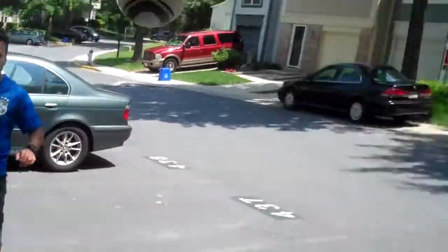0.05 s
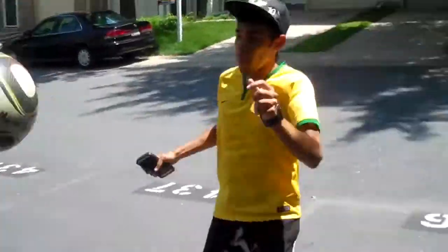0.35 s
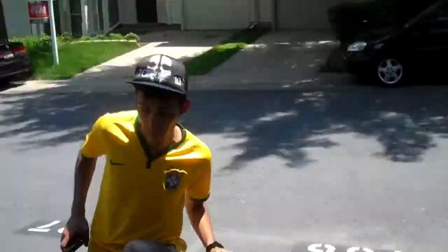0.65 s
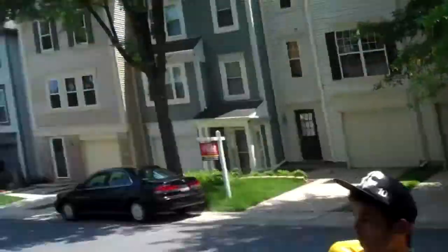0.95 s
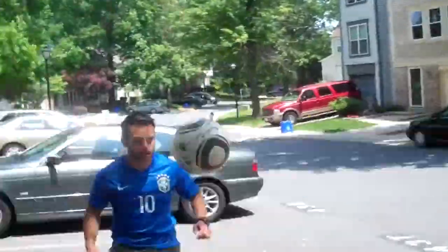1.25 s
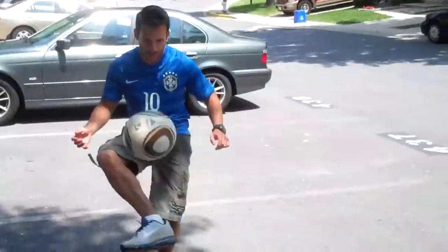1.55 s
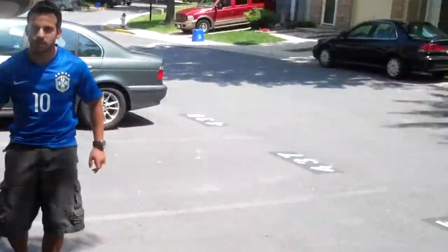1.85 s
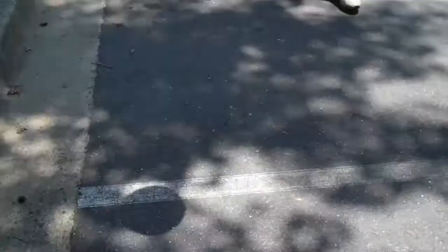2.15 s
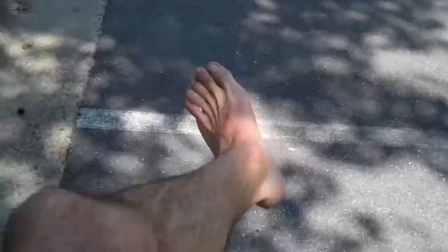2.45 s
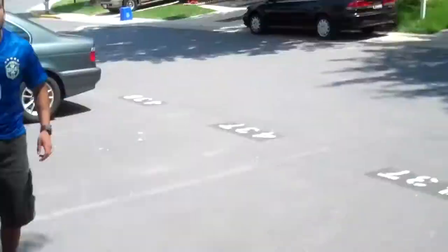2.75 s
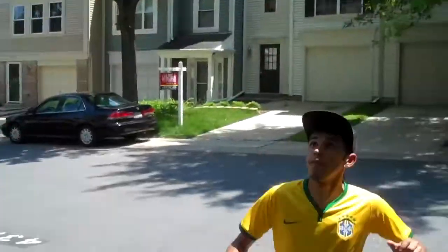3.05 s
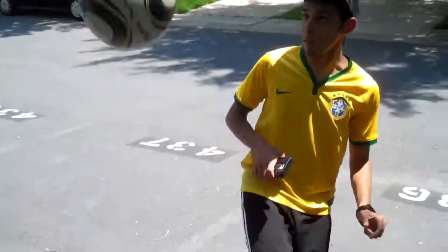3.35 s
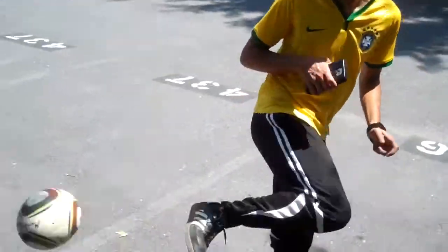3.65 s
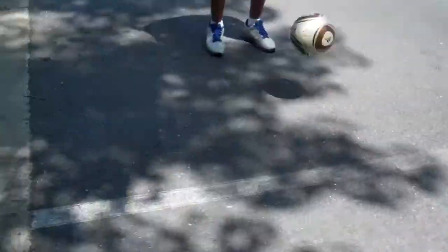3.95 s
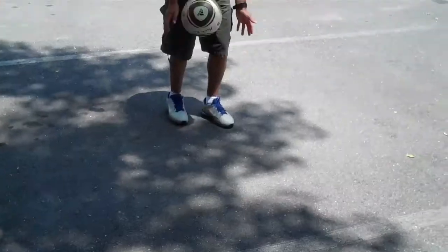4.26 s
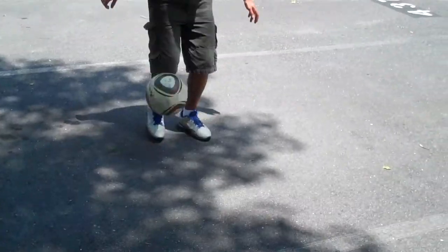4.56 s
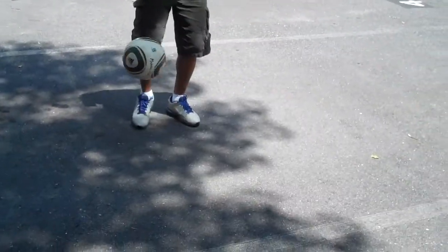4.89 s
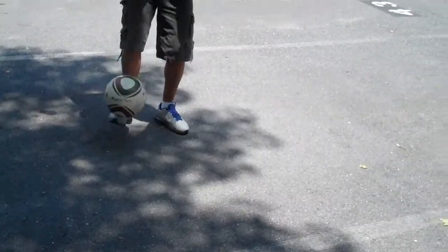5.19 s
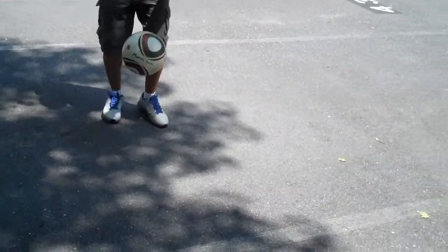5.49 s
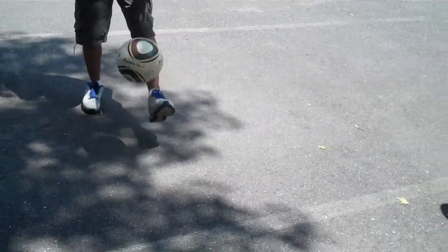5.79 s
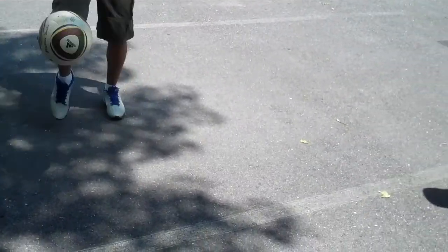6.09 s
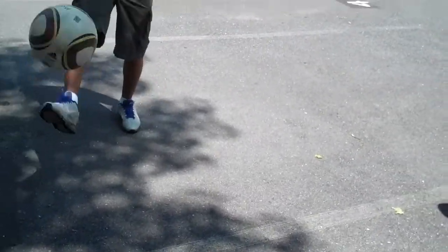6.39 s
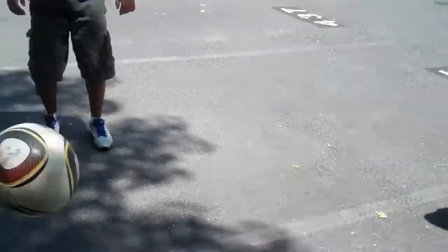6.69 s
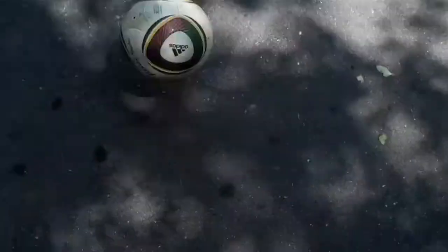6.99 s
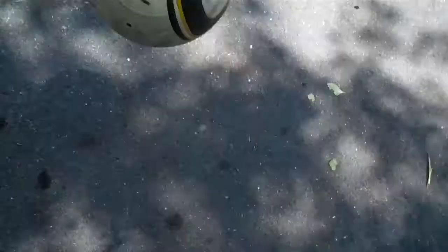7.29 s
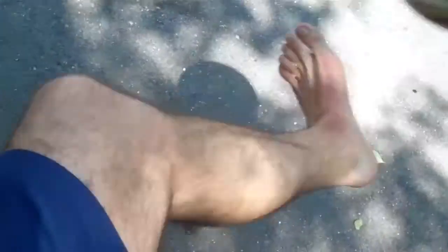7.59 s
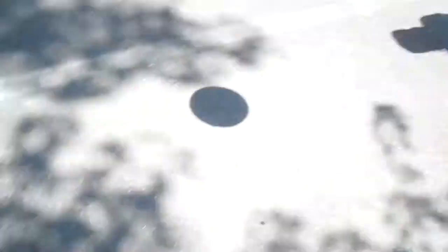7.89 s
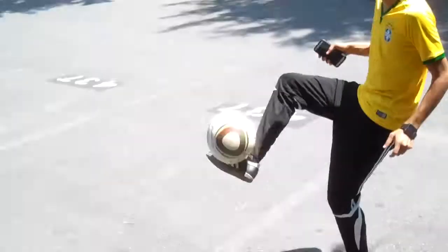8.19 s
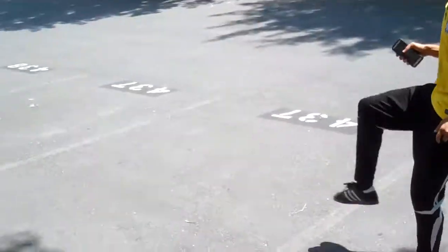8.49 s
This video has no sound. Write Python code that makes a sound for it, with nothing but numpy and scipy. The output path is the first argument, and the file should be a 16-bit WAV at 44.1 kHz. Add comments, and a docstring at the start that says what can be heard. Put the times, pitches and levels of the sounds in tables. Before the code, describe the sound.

A soccer ball is juggled on a quiet asphalt street, heard close and fairly dry with a slight echo off houses. Shoes scuff and a thin bird whistle sounds in the first half second. The loudest ball slap lands at 0.6 seconds, sharp with a faint hollow ring. More touches follow at 1.5, 2.4 and 3.6 seconds, the one at 2.4 close and thumping. Softer taps come at about 3.9, 4.7, 5.3, 5.8 and 6.3 seconds, then closer slaps at 7 and 7.6 and a lighter one at 8.3. Between them, soles scrape, grit snaps and clothes swish softly. A bird gives a buzzy chirp and raspy calls just after 5 seconds. Wind bumps the microphone with a low rumble at about 2.1 and 8 seconds. Faint distant traffic, hissing leaves and a very low hum continue underneath.

```python
"""Sharp slaps of a soccer ball, juggled by three players on an asphalt street; one holds the camera.
Each touch slaps the taut skin, squashes the ball (a low thump) and leaves the air inside ringing faintly.
Shoes scuff the asphalt and snap small stones, clothes swish, birds call over far traffic, leaves and
a faint hum, a breeze bumps the microphones, and the house fronts answer."""
import sys
import numpy as np
from scipy import signal
from scipy.fft import rfft, irfft, next_fast_len
from scipy.io import wavfile
from scipy.ndimage import uniform_filter1d, map_coordinates

SR = 44100
rng = np.random.default_rng(int(sys.argv[2]) if len(sys.argv) > 2 else 0)


def master_out(mix):
    """Clip the mix to full scale and print it as 16-bit PCM to the path in sys.argv[1]."""
    frames = np.transpose(np.atleast_2d(mix))
    ceiling = np.clip(frames, -1, 1)
    pcm = np.round(ceiling * 32767).astype(np.int16)
    wavfile.write(sys.argv[1], SR, pcm)


N = 376613


def amp(db):
    return 10 ** (np.asarray(db) / 20)


def unit(x):
    """Scaled to rms 1."""
    return x / np.sqrt(np.mean(x ** 2) + 1e-20)


def burst(x):
    """Scaled to the energy of 10 ms at rms 1."""
    return x / np.sqrt(np.sum(x ** 2) / (SR / 100) + 1e-20)


def along(points, hz):
    """(Hz, value) points read on a log axis."""
    freqs, values = np.transpose(points)
    return np.interp(np.log(hz + 1), np.log(freqs + 1), values)


def wobble(rate):
    """A smooth random curve, rate knots a second."""
    return map_coordinates(rng.standard_normal(int(N * rate / SR) + 4), [np.arange(N) * rate / SR])


def filtered(x, response):
    """x through a complex frequency response."""
    size = next_fast_len(N + SR // 2)
    return irfft(rfft(x, size) * response(np.fft.rfftfreq(size, 1 / SR)), size)[..., :N]


def struck(x, spectrum, size=4096):
    """x through a minimum-phase EQ of (Hz, dB) points, which keeps attacks sharp."""
    cepstrum = irfft(np.log(amp(along(spectrum, np.fft.rfftfreq(size, 1 / SR)))))
    cepstrum[1:size // 2] *= 2
    cepstrum[size // 2 + 1:] = 0
    return signal.fftconvolve(x, irfft(np.exp(rfft(cepstrum))))[:len(x)]


def late(x, s):
    """x delayed by s seconds."""
    return np.pad(x, (max(0, round(s * SR)), 0))[:len(x)]


def add(track, s, x):
    """Mix x into the track at time s."""
    part = track[max(0, round(s * SR)):][:len(x)]
    part += x[:len(part)]


def widen(pair, colour=lambda hz: 1):
    """Two unrelated signals as mid and side, with a stereo width for each band."""
    # (frequency [Hz], left-right likeness [0 to 1])
    likeness = [(30, 0.31), (120, 0.98), (500, 0.92), (1500, 0.78), (4000, 0.053), (9000, 0.13)]
    angle = lambda hz: np.arccos(along(likeness, hz)) / 2
    mid, side = filtered(pair, lambda hz: colour(hz) * np.array([np.cos(angle(hz)), np.sin(angle(hz))]))
    return np.array([mid + side, mid - side])


def rush(spectrum, patchy_db):
    """Coloured stereo noise of rms 1 with patches of random gain."""
    bands = signal.stft(rng.standard_normal((2, N)), nperseg=512)[2]
    patches = uniform_filter1d(rng.standard_normal(bands.shape[1:]), size=6, axis=0)
    patches = unit(uniform_filter1d(patches, size=14, axis=1))
    pair = signal.istft(bands * amp(patchy_db * patches), nperseg=512)[1][:, :N]
    return unit(widen(pair, lambda hz: amp(along(spectrum, hz))))


def contact(t, crumple, t60):
    """A sharp first click, then a dying crumple of noise."""
    return burst(t == 0) + crumple * burst(rng.standard_normal(len(t)) * amp(-60 * t / t60))


def street():
    """The bed: distant traffic and the hiss of leaves swell and ebb together."""
    # the bed's fader: (time [s], level [dB])
    fader = [(0.0, -52.5), (0.24, -51.5), (2.43, -55), (2.66, -58.5), (3.02, -58), (4.99, -59), (6.18, -56),
             (7.99, -59), (8.54, -52)]
    # rumble and hiss: (frequency [Hz], relative level [dB])
    traffic_eq = [(15, -38.5), (25, -5.5), (229, -14), (350, -15), (515, -17.5), (757, -17), (1700, -20.5),
                  (2500, -26), (3250, -44), (5500, -120)]
    leaves_eq = [(1200, -15), (2300, -0.5), (3800, 1.5), (5200, -5), (7000, -12), (8000, -16), (9000, -20),
                 (11300, -24.5), (13000, -31)]
    level_db = np.interp(np.arange(N) / SR, *np.transpose(fader))
    traffic = amp(3.5 + 0.32 * wobble(12)) * rush(traffic_eq, patchy_db=0.5)
    leaves = amp(0.5) * rush(leaves_eq, patchy_db=0.5)
    return amp(level_db) * (traffic + leaves)


def air_conditioner(drift_cycles=0.54):
    """A faint, slightly unsteady hum from one of the houses."""
    # hum partials: (frequency [Hz], level [dB])
    partials = [(119, -64.5), (237, -67)]
    t = np.arange(N) / SR
    return sum(amp(db) * unit(np.sin(2 * np.pi * (hz * t + drift_cycles * wobble(3.2))))
               for hz, db in partials)


def breeze(calm_db=-61.5):
    """Lumps of moving air bump the microphone ports; each puff swells and fades at the same rate."""
    # puffs: (peak time [s], swell and fade time constant [s], level [dB])
    puffs = [(2.13, 0.031, -27), (3.3, 0.6, -51), (7.87, 0.045, -43), (8.017, 0.016, -27.5),
             (8.16, 0.037, -35.5), (8.38, 0.12, -40.5)]
    # low buffeting: (frequency [Hz], relative level [dB])
    buffet_eq = [(15, 0.5), (40, 7), (90, -0.5), (150, -8), (260, -17), (600, -54.5), (2000, -76)]
    t = np.arange(N) / SR
    flow = amp(calm_db) + sum(amp(db) * np.exp(-np.abs(t - s) / fade) for s, fade, db in puffs)
    return flow * amp(1.6 * wobble(32)) * rush(buffet_eq, patchy_db=0)


def bird_note(length, start_hz, end_hz, waver_rate, waver):
    """One note swells and fades while its wavering pitch slides."""
    progress = np.linspace(0, 1, int(length * SR))
    pitch = (start_hz + (end_hz - start_hz) * progress) * (1 + waver * wobble(waver_rate)[:len(progress)])
    return np.sin(np.pi * progress) * np.sin(2 * np.pi * np.cumsum(pitch) / SR)


def birds(attack_s=0.02, release_s=0.038):
    """Thin gliding whistles, a buzzy rising chirp and raspy calls from the trees."""
    # whistles: (time [s], length [s], start [Hz], end [Hz], level [dB], waver [share of pitch])
    whistles = [(0.102, 0.19, 4870, 4570, -48.5, 0.013), (0.237, 0.14, 7730, 8140, -62.5, 0.011),
                (2.907, 0.92, 2315, 2355, -65, 0.014), (5.01, 0.094, 5390, 5470, -59, 0.017)]
    # raspy calls: (time [s], length [s], level [dB])
    rasps = [(5.147, 0.13, -51.5), (5.263, 0.17, -55.5), (8.313, 0.11, -55)]
    # their tone: (frequency [Hz], relative level [dB])
    rasp_eq = [(1800, -24), (3200, 1), (3900, 3.5), (4350, 4), (4900, -0.5), (6000, -8.5), (8000, -38)]
    track, t = np.zeros(N), np.arange(N) / SR
    for s, length, start_hz, end_hz, db, waver in whistles:
        add(track, s, amp(db) * bird_note(length, start_hz, end_hz, waver_rate=330, waver=waver))
    chirp = bird_note(length=0.095, start_hz=4000, end_hz=4700, waver_rate=800, waver=0.08)
    add(track, 5.15, amp(-41.5) * chirp)
    rasp = unit(filtered(rng.standard_normal(N), lambda hz: amp(along(rasp_eq, hz))))
    effort = sum(amp(db) * np.clip(np.minimum((t - s) / attack_s, (s + length - t) / release_s + .5), 0, 1)
                 for s, length, db in rasps)
    return track + rasp * effort * amp(2.8 * wobble(110))


def stones():
    """Single bits of grit snap as a sole rolls over them."""
    # snaps: (time [s], level [dB])
    snaps = [(0.086, -41), (0.112, -44), (3.158, -48), (4.193, -43), (5.486, -41.5), (5.503, -38.5),
             (5.551, -49), (6.016, -51), (6.038, -43.5), (6.718, -45), (6.825, -46), (7.469, -51.5)]
    # their tone: (frequency [Hz], relative level [dB])
    snap_eq = [(500, -19), (1500, -2.5), (2600, 2.5), (4000, -0.5), (7000, -15), (11000, -32.5),
               (14000, -57)]
    track, t = np.zeros(N), np.arange(SR // 20) / SR
    for s, db in snaps:
        add(track, s, amp(db) * burst(struck(contact(t, crumple=0.86, t60=0.023), snap_eq)))
    return track


def shoes_and_clothes(graininess=0.66, grit_graininess=0.91, sole_db=-1.5):
    """Heels thud, soles scrape or clop, grit crunches; the same noise, long and soft, is swishing cloth."""
    # footfalls and scuffs, with a few long soft swishes of clothing:
    # (time [s], length [s], level [dB], grittiness [dB]: below 0 dull, above 0 bright)
    moves = [(0.078, 0.029, -44, 2.5), (0.1, 0.032, -44, 4), (0.1934, 0.005, -25, -14.5),
             (0.291, 0.0029, -37, 0.5), (0.384, 0.019, -38, -14), (0.393, 0.02, -40, 8),
             (0.402, 0.0084, -30, 5.5), (0.978, 0.012, -44.5, -9), (1.063, 0.016, -40.5, -24),
             (1.233, 0.026, -41.5, 2.5), (1.418, 0.2, -54, 21), (1.905, 0.033, -44.5, 3),
             (1.932, 0.028, -44.5, 7.5), (2.295, 0.063, -50, 12), (2.32, 0.0033, -37.5, 6),
             (2.88, 0.017, -46, -4.5), (2.95, 0.18, -55.5, -5.5), (3.156, 0.014, -46.5, 8),
             (3.178, 0.0038, -37.5, -7), (3.68, 0.16, -52, 3), (4.257, 0.071, -48.5, 6),
             (4.431, 0.081, -51.5, 4), (5.478, 0.014, -35, 1), (5.498, 0.032, -45.5, 3),
             (5.53, 0.063, -47.5, 3.5), (6.005, 0.031, -46, 3.5), (6.029, 0.024, -44.5, 4.5),
             (6.645, 0.019, -50, 7), (6.713, 0.039, -42, 5.5), (6.814, 0.01, -43.5, -4),
             (7.411, 0.081, -49.5, 1), (8.068, 0.013, -39, -3.5)]
    # their low, middle and high layers: (frequency [Hz], relative level [dB])
    heel_eq = [(60, -23.5), (220, -7.5), (430, -2), (600, -6), (850, -4), (1600, -21.5), (5000, -57)]
    sole_eq = [(300, -29), (900, -4), (1700, 0), (2400, -3.5), (4500, -33), (10000, -63)]
    grit_eq = [(900, -14.5), (2500, 1), (3800, 2.5), (5500, -3.5), (8000, -16.5), (11500, -28.5),
               (14000, -51)]
    # small hollow clops: (time [s], length [s], resonance [Hz], level [dB])
    clops = [(0.081, 0.0068, 1710, -29.5), (0.084, 0.0075, 2480, -39), (0.194, 0.0033, 1880, -32),
             (0.982, 0.0054, 1730, -41), (0.98, 0.0058, 1020, -45), (1.064, 0.0038, 440, -31.5),
             (3.178, 0.004, 1010, -35.5), (5.507, 0.078, 754, -52), (6.04, 0.083, 640, -52)]
    track, t = np.zeros(N), np.arange(SR // 3) / SR
    press = lambda length: (t / length) ** 0.55 * np.exp(-2.6 * t / length)
    grains = lambda spread: rng.standard_normal(len(t)) * np.exp(spread * rng.standard_normal(len(t)))
    sized = lambda x, length: x * np.sqrt(length * SR / np.sum(x ** 2))  # energy of that length at rms 1
    layers = (heel_eq, graininess), (sole_eq, graininess), (grit_eq, grit_graininess)
    for s, length, db, gritty_db in moves:
        shares = amp([-gritty_db, sole_db, gritty_db])
        for share, (eq, spread) in zip(shares / np.linalg.norm(shares), layers):
            rub = struck(grains(spread) * press(length), eq)
            add(track, s, amp(db) * share * sized(rub, length))
    for s, length, hz, db in clops:
        clop = signal.lfilter(*signal.iirpeak(hz, Q=5.5, fs=SR), grains(graininess) * press(length))
        add(track, s, amp(db) * sized(clop, length))
    return track


def cavity(t, blur_cycles=0.8):
    """The air inside the ball rings at new strengths each touch; spin and wobble blur each mode."""
    # air modes: (frequency [Hz], relative level [dB], t60 [s])
    modes = [(1115, -2, .19), (1225, 0, .2), (1850, -9, .15), (2445, 4, .14), (3070, -8, .13),
             (3230, -8, .13)]
    ring = np.zeros(len(t))
    for hz, db, t60 in modes:
        drift = np.cumsum(rng.standard_normal(len(t))) / np.sqrt(SR)
        envelope = amp(db + rng.normal(0, 1) - 60 * t / t60)
        ring += envelope * np.sin(2 * np.pi * (hz * t + blur_cycles * drift + rng.random()))
    return burst(ring)


def skin_slap(t, hz, hard_db, sag=0.84, sag_s=0.00023):
    """The skin rings briefly; its pitch drops as the contact patch spreads, and flutters as it deforms."""
    t60 = 0.027 * amp(-0.36 * hard_db)  # a hard contact stops the skin sooner
    pitch = hz * (1 + sag * np.exp(-t / sag_s))
    flutter = 0.3 * np.cumsum(rng.standard_normal(len(t))) / np.sqrt(SR * t60)
    return burst(np.sin(2 * np.pi * (np.cumsum(pitch) / SR + flutter)) * amp(-60 * t / t60))


def skin_crack(t, lowpass, crumple):
    """The bright attack: the skin crumples as the contact patch spreads."""
    # the crack's tone: (frequency [Hz], relative level [dB])
    crack_eq = [(600, -42.5), (1100, 1), (1700, 5), (2400, 4.5), (4000, 2.5), (5500, -0.5), (8000, -15.5),
                (11000, -15.5), (14000, -71.5)]
    return burst(signal.sosfilt(lowpass, struck(contact(t, crumple, t60=0.017), crack_eq)))


def panel_knock(t):
    """The body of the hit: the ball's panels knock under the blow."""
    # the knock's tone: (frequency [Hz], relative level [dB])
    knock_eq = [(90, -25.5), (180, -1.5), (260, -7.5), (350, -1), (480, -7.5), (650, -1), (1000, -5),
                (1500, -9), (4000, -90)]
    return burst(struck(contact(t, crumple=1.76, t60=0.068), knock_eq))


def ball(thump_hz=112, squash_s=0.0038, shell_hz=1240, on_foot_s=0.014, usual_db=-16.5, usual_m=3.1):
    """Every touch, as heard at the camera, as it reaches things near by, and as it spreads 1 m away."""
    # touches: (time [s], level [dB], weight or squash [dB], hardness [dB], slap [Hz], distance [m],
    # ground echo delay [s], lift-off [dB], shell ring [dB], hollow knock [Hz], hollow knock [dB],
    # air ring [dB])
    touches = [(0.6035, -12.5, -8, -2.5, 1510, 1.78, 0.0031, -37, -2, 380, -14, -15.5),
               (1.543, -24, 2, 0.5, 1510, 4.4, 0.0025, -14, -2, 994, -1, -19),
               (2.4028, -19.5, 1, 4, 1450, 1.03, 0.0024, 6.5, 3, 233, -7, -11),
               (3.598, -18, -16, 5, 1925, 1.76, 0.0028, -31, -23, 1060, -4, -13),
               (3.9092, -28, -8, -1.5, 1510, 2.9, 0.0032, -5.5, -1.5, 182, -5.5, -19),
               (4.727, -28, 0.5, 5, 1593, 2.2, 0.00065, -10, -4, 770, -14, -16),
               (5.2706, -36, -5.5, -3.5, 1440, 5.1, 0.00096, -23, -23, 343, -11, -22),
               (5.7532, -37.5, 3.5, 5.5, 1500, 3.7, 0.0011, -16, -1, 270, -1, -18),
               (6.2683, -25, -7.5, -1, 1466, 3.3, 0.00147, -28, -2, 660, -7, -27),
               (7.012, -21.5, 0.5, 0, 1696, 1.3, 0.00073, -14, -25, 360, -4.5, -15),
               (7.561, -19, -19, 1, 1850, 0.85, 0.0024, -13, -0.5, 260, -13.5, -15.5),
               (8.2714, -28, 3.5, 8, 1447, 3.7, 0.0006, -7, 0, 550, -32, -26)]
    # a touch heard from all sides at once: (frequency [Hz], relative level [dB])
    all_round_eq = [(40, -27), (120, -1.5), (300, -12), (850, -10.5), (1200, -4.5), (1600, -4), (2300, -9),
                    (4000, -7.5), (6000, -18.5), (8000, -28.5), (11000, -32), (14000, -57)]
    direct, around, at_source = np.zeros((3, N))
    t = np.arange(SR // 3) / SR
    rough_ground = signal.butter(1, 3500, fs=SR, output="sos")
    ring = lambda hz, t60: burst(np.sin(2 * np.pi * hz * t) * (1 - np.exp(-t / 0.0011))
                                 * amp(-60 * t / t60))
    all_round = struck(1.0 * (t == 0), all_round_eq)
    shell = ring(shell_hz, t60=0.014)
    # the ball flattens and springs back
    thump = late(burst(-np.sin(2 * np.pi * thump_hz * t) * t * np.exp(-t / squash_s)), 0.00036)
    for (s, db, weight_db, hard_db, slap_hz, distance, ground_s,
         lift_db, shell_db, hollow_hz, hollow_db, air_db) in touches:
        slap = skin_slap(t, slap_hz, hard_db)
        # a soft contact dulls the crack; so does a strong blow, which spreads the contact patch
        edge_hz = 6530 * amp(0.71 * hard_db - 0.21 * (db - usual_db))
        lowpass = signal.butter(2, min(edge_hz, SR / 3), fs=SR, output="sos")
        face, underside = (slap + amp(hard_db) * skin_crack(t, lowpass, crumple=1)
                           + amp(-3 + 0.2 * weight_db) * panel_knock(t) for _ in range(2))
        # the underside is heard off the asphalt (sound at 343 m/s); the two paths share the energy
        bounce = amp(-1.5) * distance / (distance + 343 * ground_s)
        reflection = bounce * late(signal.sosfilt(rough_ground, underside), ground_s)
        blow = (face + reflection) / np.hypot(1, bounce)
        hollow = ring(hollow_hz, t60=11 / hollow_hz)  # its pitch depends on what meets the ball
        # lift-off: the skin peels off the foot and the shell snaps back
        lift = late(burst(amp(-2) * skin_crack(t, lowpass, crumple=7.5) + shell), on_foot_s)
        after = amp(shell_db) * shell + amp(hollow_db) * hollow + amp(lift_db) * lift
        air = amp(air_db) * cavity(t)
        add(direct, s, amp(db) * (blow + amp(weight_db) * thump + after + air))
        # echo sends: farther touches have more scatter beside their direct sound
        radiated = np.std(blow + after) * unit(signal.sosfilt(lowpass, all_round))
        send = amp(db) * (radiated + amp(5) * air)
        add(around, s, (distance / usual_m) ** 0.59 * send)
        add(at_source, s, distance * send)
    return direct, around, at_source


def echo(x, decay, build_s):
    """A diffuse echo builds up and dies by band; a fresh tail each half second, as the players move."""
    out = np.zeros((2, N + SR))
    for start in range(0, N, SR // 2):
        hz, t, bands = signal.stft(rng.standard_normal((2, SR * 3 // 4)), SR, nperseg=256)
        tail = signal.istft(bands * amp(-60 * t / along(decay, hz)[:, None]), SR, nperseg=256)[1]
        tail *= 1 - np.exp(-(np.arange(tail.shape[1]) / SR / build_s) ** 2)
        wet = signal.fftconvolve(x[None, start:start + SR // 2], tail / np.linalg.norm(tail[0]), axes=1)
        for channel, part in zip(out, wet):
            add(channel, start / SR, part)
    return out[:, :N]


def outdoors(x, around, distant, near_db, far_db):
    """Direct sound at two close ports, scatter from bodies and parked cars, and the house fronts' echo."""
    # microphone ports: (frequency [Hz], left minus right [dB])
    balance = [(100, -3), (1200, 0), (2300, -1.5), (4200, -4.5), (7600, 5), (13000, -11)]
    # (frequency [Hz], left port's phase lead [rad])
    lead = [(50, .1), (1500, .22), (3200, .45), (4500, .95), (6000, 1.15), (9000, .8), (12000, 1.4)]
    # dull slapbacks off the house fronts: (delay [s], level [dB])
    slapbacks = [(.043, -18.5), (0.146, -27.5)]
    # the houses' diffuse tail: (frequency [Hz], t60 [s])
    house_decay = [(100, 1), (500, 0.2), (1400, 0.78), (4000, 0.38), (10000, 0.39)]
    # its tone: (frequency [Hz], gain [dB])
    house_eq = [(50, 3), (140, 4), (350, -21), (900, -7.5), (1300, -4.5), (1800, -8), (2600, -6),
                (4500, -1.5), (8000, 3.5), (12000, 5)]
    split = lambda table, hz: np.outer([.5, -.5], along(table, hz))
    direct = filtered(x, lambda hz: amp(split(balance, hz)) * np.exp(1j * split(lead, hz)))
    returns = sum(amp(db) * late(x, delay) for delay, db in slapbacks)
    walls = filtered(returns, lambda hz: 1 / (1 + (hz / 260) ** 2))
    near = echo(around, decay=[(200, 0.23), (2000, 0.15), (5000, 0.09), (10000, 0.15)], build_s=0.0036)
    far = filtered(echo(distant, house_decay, build_s=0.041), lambda hz: amp(along(house_eq, hz)))
    return direct + walls + widen(amp(near_db) * near + amp(far_db) * far)


def gain_control(x, threshold_db=-22, slope=0.14, recover_db_per_s=5.0, attack_s=0.1):
    """The camera turns itself down a little after each loud peak and creeps back up."""
    over_db = np.maximum(20 * np.log10(np.abs(x).max(axis=0) + 1e-9) - threshold_db, 0)
    recovered = recover_db_per_s * np.arange(N) / SR
    cut_db = np.maximum.accumulate(slope * over_db + recovered) - recovered
    pole = np.exp(-1 / (attack_s * SR))
    return x * amp(-signal.lfilter([1 - pole], [1, -pole], cut_db))


def scene(players_m=3):
    """Close, fairly dry players and echoing birds over the street's bed."""
    touches, around, at_source = ball()
    moves, song = shoes_and_clothes() + stones(), birds()
    players = outdoors(touches + moves, around + moves, at_source + players_m * moves,
                       near_db=-12, far_db=-27.5)
    birdsong = outdoors(song, song, song, near_db=-2, far_db=0)
    return players + birdsong + street() + air_conditioner() + breeze()


def record(dry, hardness=6, rolloff_hz=12300, top_hz=14500):
    """The camera rides its gain, flattens the loudest slaps and rolls off the treble to its band limit."""
    held = gain_control(dry)
    flattened = held / (1 + np.abs(held) ** hardness) ** (1 / hardness)
    dulled = filtered(flattened, lambda hz: 1 / np.sqrt(1 + (hz / rolloff_hz) ** 20))
    return filtered(dulled, lambda hz: 1 / (1 + (hz / top_hz) ** 80))


dry = scene()
out = record(dry)
master_out(out)
```